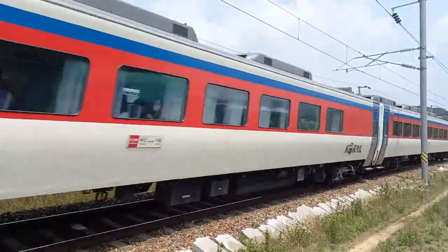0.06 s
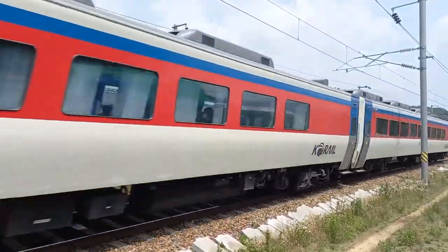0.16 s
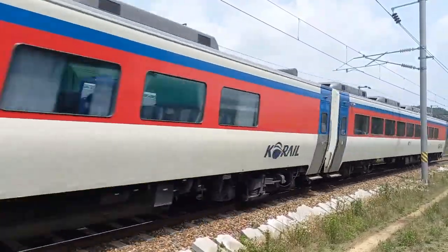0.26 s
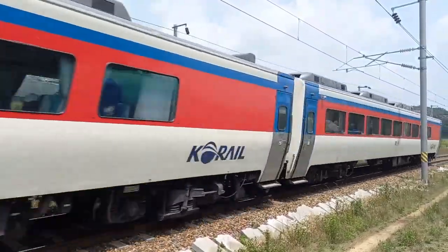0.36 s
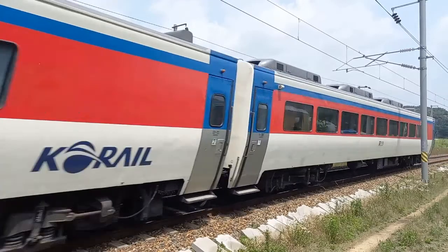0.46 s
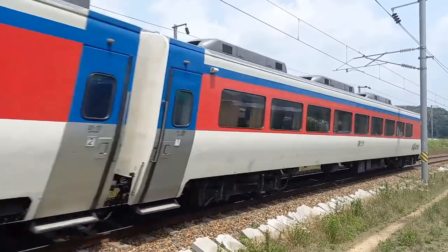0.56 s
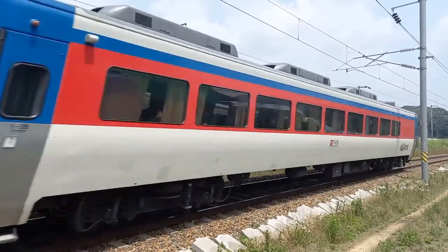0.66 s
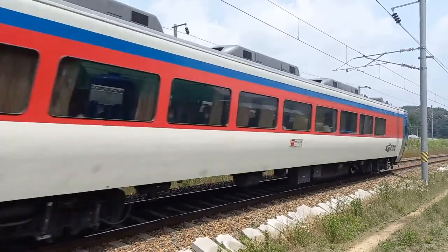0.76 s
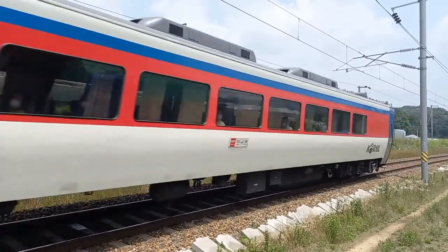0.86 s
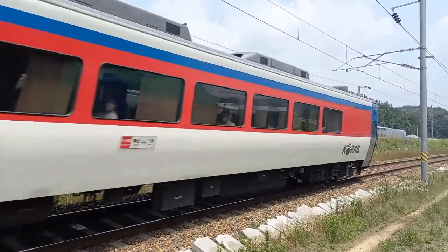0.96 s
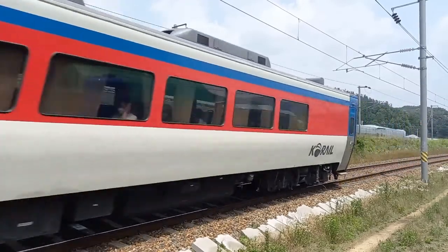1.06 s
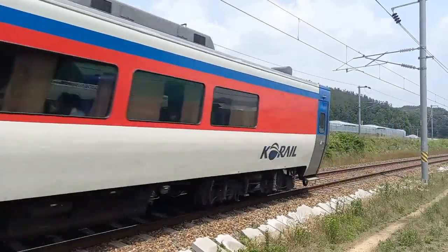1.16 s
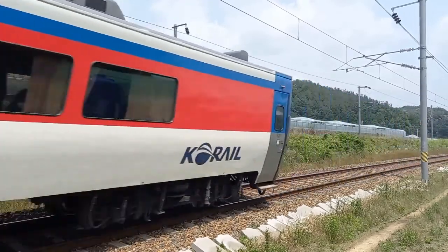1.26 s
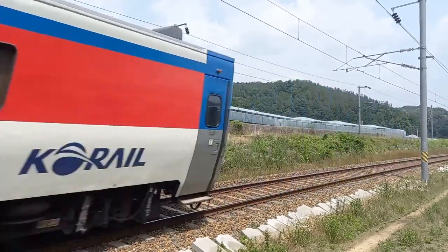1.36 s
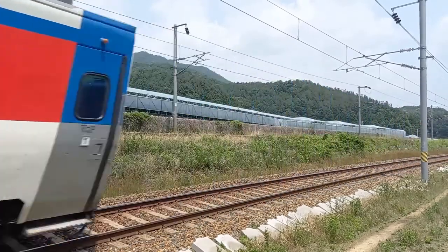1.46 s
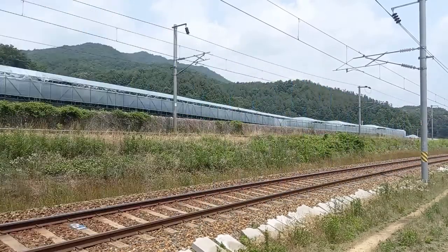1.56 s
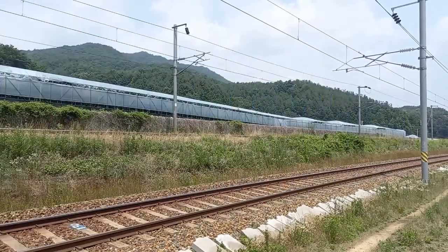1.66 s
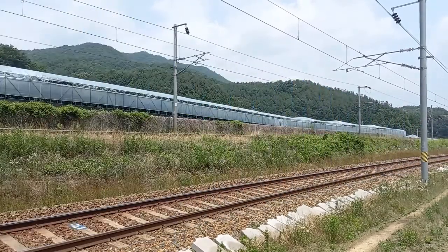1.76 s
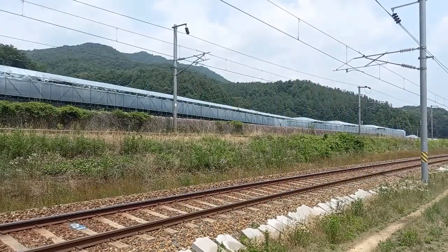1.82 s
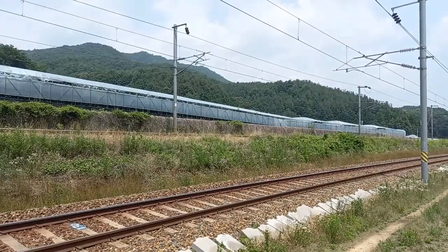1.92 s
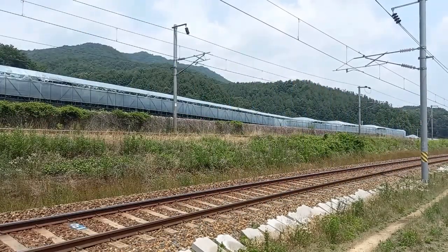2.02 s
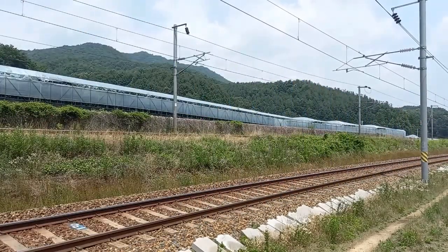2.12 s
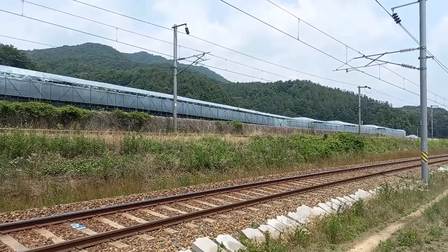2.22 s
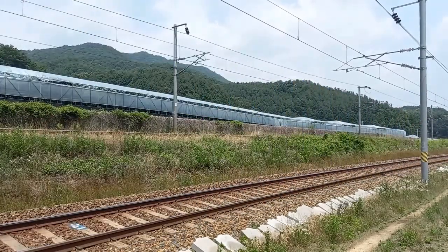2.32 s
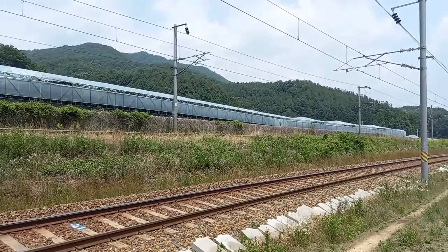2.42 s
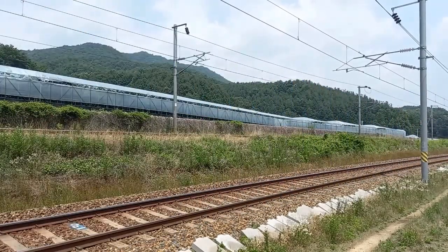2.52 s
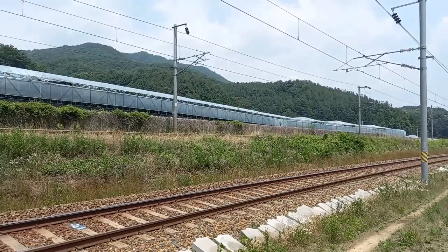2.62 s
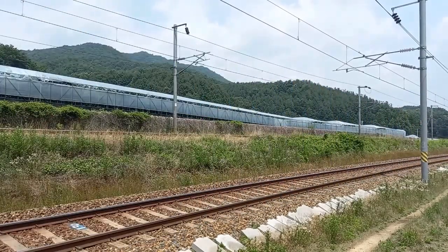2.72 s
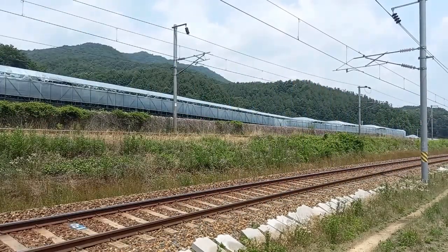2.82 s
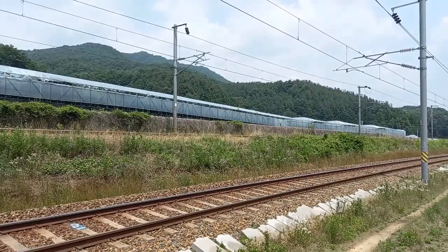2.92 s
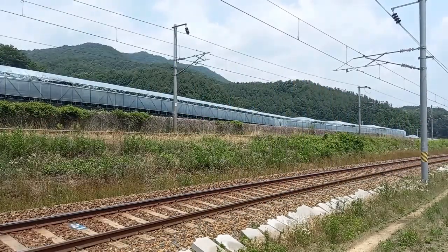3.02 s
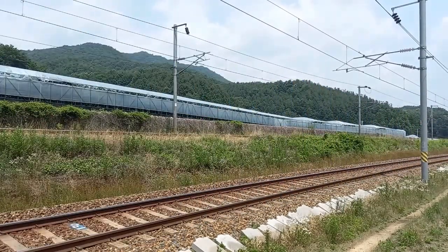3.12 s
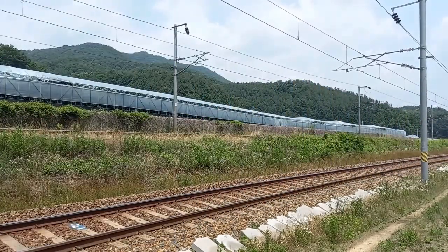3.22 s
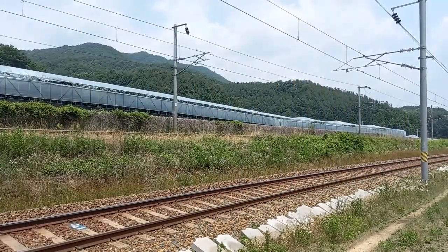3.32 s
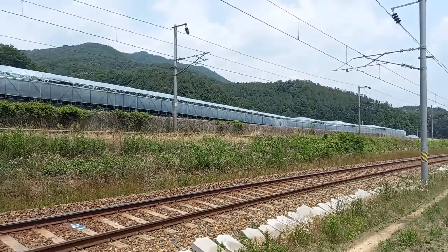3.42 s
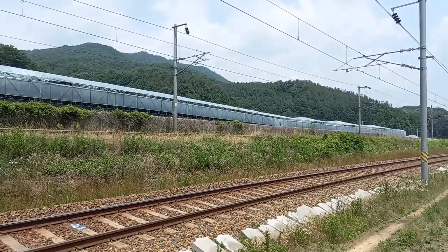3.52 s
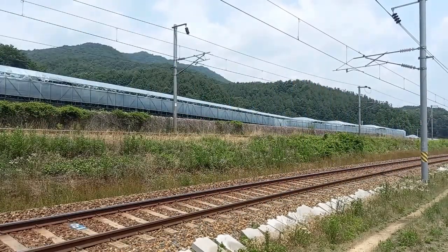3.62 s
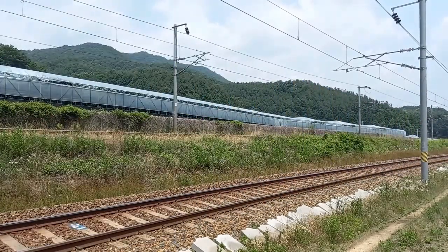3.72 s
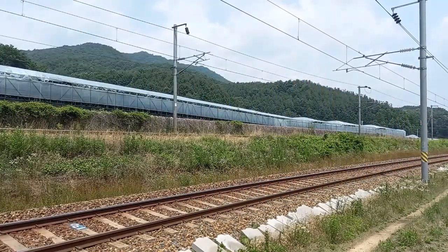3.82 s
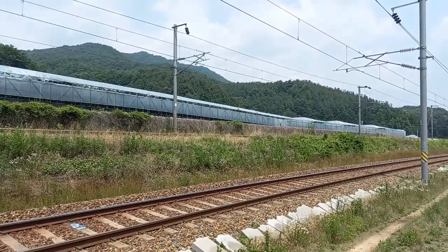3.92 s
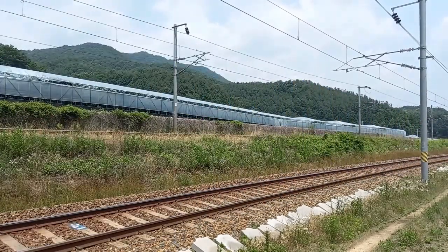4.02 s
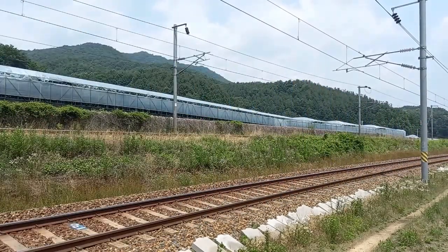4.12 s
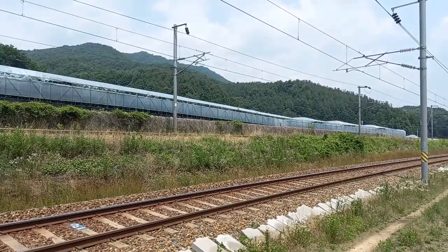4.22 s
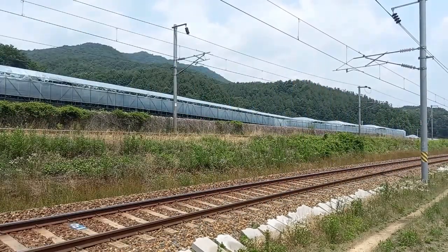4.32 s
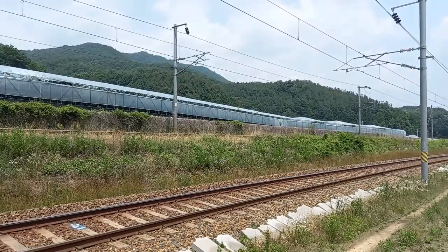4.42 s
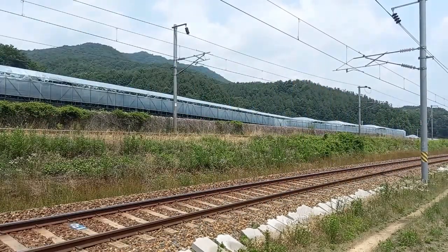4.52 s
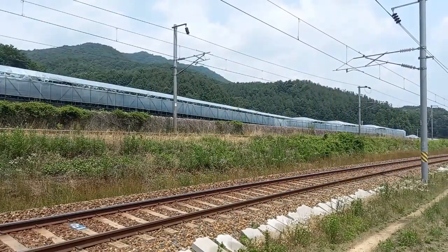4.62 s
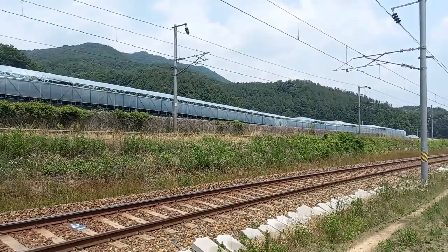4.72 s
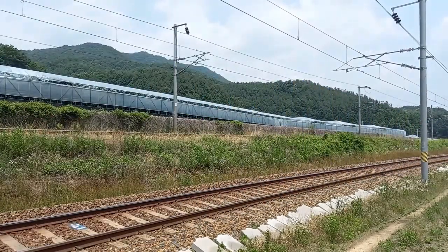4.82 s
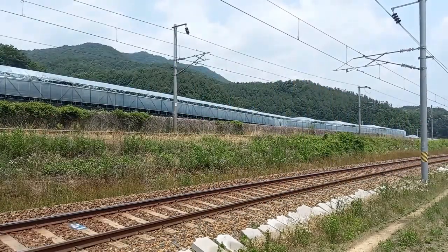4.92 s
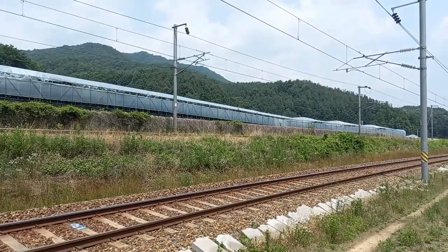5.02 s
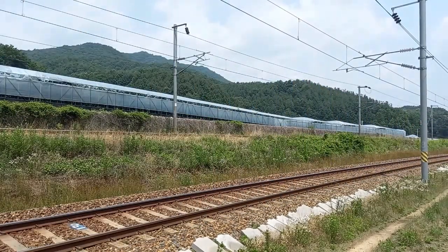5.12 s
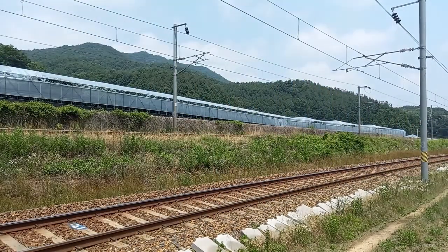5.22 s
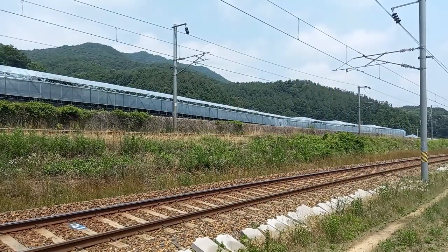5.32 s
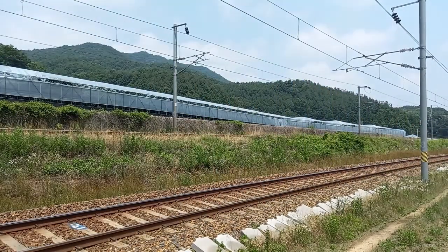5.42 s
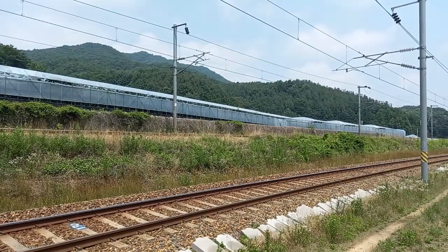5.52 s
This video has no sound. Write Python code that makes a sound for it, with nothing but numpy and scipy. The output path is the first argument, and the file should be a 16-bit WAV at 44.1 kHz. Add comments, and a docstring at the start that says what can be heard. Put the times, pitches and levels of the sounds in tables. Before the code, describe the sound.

Close trackside pass of a train's tail: booming roar, hiss and whine, sharp sizzling rail-joint knocks, a singing rail fading, abrupt near silence.

```python
"""The last coaches of a passenger train roll past a phone beside the track and draw away to the left.
Shaped noise and short low swings make the rumble; noise bands make the rolling roar, hiss and ringing.
Gliding sine tones make the whine of underfloor machines. Axles knock over a rail joint: sizzles come through
the steel, low knocks through the air; several later knocks follow a sizzle by about 60 ms. The rail sings
on, wind buffets the phone's two microphone openings (ports), and a cut at the end leaves a faint hush."""
import sys
import numpy as np
from scipy import signal
from scipy.fft import rfft, irfft
from scipy.io import wavfile
from scipy.ndimage import uniform_filter1d, map_coordinates

SR = 44100
rng = np.random.default_rng(int(sys.argv[2]) if len(sys.argv) > 2 else 0)


def transcribe(signal):
    """Save signal, clipped to [-1, 1], as a 16-bit WAV file at the path in sys.argv[1]."""
    frames = np.atleast_2d(signal).T
    limited = np.clip(frames, -1, 1)
    pcm = np.round(limited * 32767).astype(np.int16)
    wavfile.write(sys.argv[1], SR, pcm)


N = 245637
T = np.arange(N) / SR  # time of every sample in seconds
FRAME, HOP = 512, 128  # length and step in samples of the short slices whose spectrum is changed


def undb(db):
    """Turn decibels into a plain factor."""
    return 10 ** (np.asarray(db) / 20)


def curve(table, x):
    """Read all columns after the first at the points x (times or pitches), with straight lines between rows."""
    columns = np.transpose(table)
    return [np.interp(x, columns[0], column) for column in columns[1:]]


def tone(table, hz):
    """Read a spectrum in dB at the frequencies hz; outside its ends it is practically silent."""
    table_hz, db = np.transpose(table)
    return np.interp(np.log(hz + 1), np.log(table_hz), db, left=-90, right=-90)


def shaped(table):
    """Random noise coloured by a spectrum, then scaled to an average strength (rms) of 1."""
    white = rfft(rng.standard_normal(N))
    coloured = irfft(white * undb(tone(table, np.fft.rfftfreq(N, 1 / SR))), N)
    return coloured / coloured.std()


def walk(rate):
    """A wandering random level: new values come at this rate per second, smoothed twice; spread 1."""
    hold = int(SR / rate)
    steps = np.repeat(rng.standard_normal(N // hold + 1), hold)
    smooth = uniform_filter1d(uniform_filter1d(steps, hold), hold)[:N]
    return smooth / smooth.std()


def to_slices(x):
    """Split a sound into pitches in Hz, slice times in seconds and the spectrum of each slice."""
    return signal.stft(x, SR, nperseg=FRAME, noverlap=FRAME - HOP)


def from_slices(spectra):
    """Join the slices into a sound again."""
    return signal.istft(spectra, SR, nperseg=FRAME, noverlap=FRAME - HOP)[1][..., :N]


def patchy(x, depth_db, rate, width_hz):
    """Let every patch of time and pitch swell and sink on its own, then scale to rms 1."""
    hz, s, spectra = to_slices(x)
    grid = rng.standard_normal((400, 400))
    at = np.meshgrid(np.minimum(hz / width_hz, 398), np.minimum(s * rate, 398), indexing="ij")
    y = from_slices(spectra * undb(depth_db * map_coordinates(grid, at, order=1)))
    return y / y.std()


def bump(s, half_s):
    """A smooth swell around the time s; half_s away from it, it has sunk to 37 percent."""
    return np.exp(-((T - s) / half_s) ** 2)


def blows(s, db, pole):
    """Each blow starts a decay; a complex pole (the factor from one sample to the next) makes it ring."""
    kicks = np.zeros(N, complex)
    kicks[(s * SR).astype(int)] = undb(db)
    return signal.lfilter([1], [1, -pole], kicks)


def burst(s, db, attack_s, t60):
    """Loudness of a row of blows: a quick rise, then a fall by 60 dB in t60 seconds."""
    fall = blows(s, db, 1000 ** (-1 / (t60 * SR)))
    missing_at_start = blows(s, db, np.exp(-1 / (attack_s * SR)))
    return (fall - missing_at_start).real.clip(0)


def receding(near, far, from_s, to_s):
    """Noise whose colour turns from near to far as the train draws away."""
    share = np.clip((T - from_s) / (to_s - from_s), 0, 1)
    return np.sqrt(1 - share) * shaped(near) + np.sqrt(share) * shaped(far)


# Colour of the hush. Each row: pitch in Hz, relative level in dB per Hz.
HUSH_TONE = [(18, -40), (30, -12.5), (81, -1), (225, -18), (750, -22.5), (970, -18), (1300, -25.5),
             (1770, -28), (3490, -32.5), (5170, -33), (6370, -19), (7300, -37), (9430, -49), (12000, -35.5),
             (15500, -37.5)]
HUSH_DB, HUSH_START_S = -69, 5.197


def hush():
    """A faint outdoor hush: noise that swells and sinks in patches, partly shared by the two ports."""
    shared = patchy(shaped(HUSH_TONE), depth_db=3.0, rate=17, width_hz=247)
    pair = [patchy(shared + 1.3 * shaped(HUSH_TONE), depth_db=1.5, rate=15, width_hz=400) for _ in range(2)]
    fade_in = np.clip((T - HUSH_START_S) / 0.006, 0, 1)
    return np.array(pair) * undb(HUSH_DB) * fade_in


# Colour of the wind. Each row: pitch in Hz, relative level in dB per Hz.
WIND_TONE = [(30, -20), (50, -8), (80, 0), (110, -5), (200, -20), (500, -30)]
# Draught of the train, then still air. Each row: time in seconds, wind level in dB.
DRAUGHT = [(0, -44), (1.8, -35.5), (2.0, -54), (3.1, -54), (5.17, -56.5)]
# Gusts. Each row: middle in seconds, half length in seconds, level in dB, left minus right in dB.
GUSTS = [(1.3, .06, -38, -3), (3.33, .06, -41, 2), (3.48, .04, -39, 10), (4.98, .05, -38, 14),
         (5.13, .08, -35, 18)]


def wind():
    """Moving air buffets each port: low noise with gusts, its noise unrelated left and right."""
    steady = undb(curve(DRAUGHT, T)[0])
    sides = []
    for side in (1, -1):  # left, right
        gusts = sum(undb(db + side * lean_db / 2) * bump(s, half_s) for s, half_s, db, lean_db in GUSTS)
        sides.append(shaped(WIND_TONE) * (steady + gusts) * undb(2 * walk(15)))
    return np.array(sides)


# Colour of the singing rail. Each row: pitch in Hz, relative level in dB per Hz.
RAIL_TONE = [(930, -6), (1060, -8), (1130, 0), (1220, -9), (1350, -3), (1500, 1), (1650, -1), (1685, -16),
             (1750, -33.5)]
# Loudness of the singing rail. Each row: time in seconds, level in dB.
RAIL_LEVEL = [(0, -37.5), (1.29, -36), (1.8, -40.5), (2.27, -41), (2.52, -39.5), (2.9, -44), (3.15, -38.5),
              (3.32, -46.5), (3.45, -37), (3.75, -37.5), (3.85, -46.5), (4.02, -41.5), (4.15, -45.5),
              (4.4, -45), (4.74, -41.5), (5.02, -48)]


def rail_song():
    """Waves in the rail travel far in two narrow bands, made from patchy noise."""
    song = patchy(shaped(RAIL_TONE), depth_db=1.2, rate=20, width_hz=150)
    return song * undb(curve(RAIL_LEVEL, T)[0])


# Axles over the joint, carried by the steel.
# Each row: start in seconds, level in dB, part under about 7 kHz in dB relative to that level.
ZINGS = [(0.285, -27, -18.5), (0.888, -27, -6), (1.1899, -30, 0), (1.789, -24, -1), (1.8744, -35, 8),
         (2.076, -24, -0.5), (2.165, -21, -6), (2.686, -18, 1), (2.776, -17.5, -1.5)]
ZING_RISE_S, ZING_T60_S = 0.0024, 0.03
ZING_LEAN_DB, ZING_OWN = 2.5, 2.2  # left minus right; weight of each port's own sizzle against the shared one
REBOUND_S, REBOUND_DB = .006, -1.5  # delay after the blow and relative level


def sizzle():
    """Blows sizzle along the steel: noise with a fast fall, a weak long tail and a rebound."""
    s, db, low_db = np.transpose(ZINGS)

    def envelope(level_db, tail):
        return burst(s, level_db, ZING_RISE_S, ZING_T60_S) + tail * burst(s, level_db, 0.0074, 0.64)

    def zing():
        high_tone = [(7600, -12), (10000, 0), (12000, -1.0), (13500, -4.0), (15000, -4.5), (15700, -1.5)]
        high = shaped(high_tone) * envelope(db, tail=0.06)
        low_tone = [(4500, -15), (5900, -1), (6600, 6.0), (7200, -2.5)]
        low = shaped(low_tone) * envelope(db + low_db, tail=0.062)
        # the wheel strikes the far rail end, heard in the top treble
        rebound_tone = [(9500, -10.5), (12000, 3), (15700, -3.5)]
        rebound = shaped(rebound_tone) * burst(s + REBOUND_S, db + REBOUND_DB, 0.00096, 0.015)
        return high + low + rebound

    shared = zing()
    pair = [(shared + ZING_OWN * zing()) * undb(side * ZING_LEAN_DB / 2) for side in (1, -1)]
    return np.array(pair) / np.hypot(1, ZING_OWN)


# Low knocks through the air; several of the later ones follow a sizzle by about 60 ms.
# Each row: start in seconds, level in dB, then clack and thud in dB relative to that level.
KNOCKS = [(0.047, -15.5, -13, -9.5), (0.47, -30, -21.5, -6), (0.587, -17, -11.5, -4), (1.717, -28, -4, -9),
          (1.805, -20, -15, 0), (2.14, -20.5, -8.5, -1.5), (2.224, -13.5, -17.5, -8.5),
          (2.748, -12.5, -13.5, -6), (2.831, -10, -16.5, -10)]
# Low tones of the ring. Each row: pitch in Hz, relative level in dB, time to fall by 60 dB in seconds.
KNOCK_MODES = [(118, -13.5, 0.31), (202, -1, 0.018), (302, -2, 0.041), (451, -15, 0.02), (713, -10, 0.03)]
# Colour of the thud. Each row: pitch in Hz, relative level in dB per Hz.
THUD_TONE = [(130, 3.5), (200, 12.5), (350, 5.5), (700, -9), (1200, -26.5)]


def knocks():
    """Knocks at the joint arrive through the air as a low ring with a clack and a thud."""
    s, db, clack_db, thud_db = np.transpose(KNOCKS)
    clack = shaped([(700, 7), (3000, -3.5), (7000, -7.0)]) * burst(s, db + clack_db, 0.0034, 0.3)
    # ballast and sleepers answer under the ring
    thud = shaped(THUD_TONE) * burst(s, db + thud_db, 0.0078, 0.21)
    ring = 0
    for k, (hz, mode_db, t60) in enumerate(KNOCK_MODES):
        pole = np.exp((2j * np.pi * hz - np.log(1000) / t60) / SR)
        uneven_db = rng.standard_normal(len(s))
        ring = ring + (-1) ** k * blows(s, db + mode_db + uneven_db, pole).imag
    return clack + thud - ring


# Clanks of the rail. Each row: start in seconds, level in dB.
RAIL_CLANK = [(2.211, -26.5), (2.697, -23.5), (2.785, -17.5)]
# Colour of the clank. Each row: pitch in Hz, relative level in dB per Hz.
CLANK_TONE = [(500, -10), (730, -2), (1000, -8), (1300, -3), (1600, 0), (1690, -2), (1780, -20),
              (2600, -22)]
# Timing of every clank: rise time in seconds, time to fall by 60 dB in seconds.
CLANK_TIMES = .0015, .14


def rail_clank():
    """The struck rail clanks: a burst of mid-pitched noise that starts fast and dies away."""
    s, db = np.transpose(RAIL_CLANK)
    rise_s, ring_s = CLANK_TIMES
    return shaped(CLANK_TONE) * burst(s, db, attack_s=rise_s, t60=ring_s)


# One whining machine per coach. Each row: time of passing in seconds, pitch of the source in Hz.
WHINES = [(-.05, 1220), (1.235, 1168)]
# One table per coach. Each row: time in seconds, level of the whine in dB, level of its octave in dB.
WHINE_LEVELS = [
    [(0, -44, -64), (.2, -40, -60), (.27, -31, -48), (.4, -36, -68), (.6, -46, -41), (.7, -50, -66),
     (1.0, -60, -72)],
    [(.65, -49, -66), (.78, -43, -48), (.86, -37, -47.5), (.91, -32.5, -36.5), (.96, -26.5, -40),
     (1.0, -37.5, -38.5), (1.08, -33, -35.5), (1.12, -35, -36.5), (1.17, -22, -52), (1.22, -27, -39),
     (1.28, -26, -43), (1.36, -35, -40), (1.41, -40, -46), (1.44, -26, -55), (1.53, -31, -63),
     (1.6, -35, -46), (1.8, -37, -51), (2.0, -60, -73)],
]
SPEED_M_S, TRACK_M = 23, 5.2  # train speed, distance to the track
# the left port's lead: middle value, swing to either side, how early before the pass and how fast it swings
LEAD_MS, SWING_MS, SWING_EARLY_S, SWING_S = 0.22, 0.22, 0.15, 0.1
WHINE_JITTER_HZ = 8
WHINE_WAVER_DB, WHINE_FLUTTER_DB, WHINE_PORT_DB = 1.5, 3, 1.5  # slow, fast, and separate at each port


def whine(row, levels):
    """An underfloor machine whines with its octave, breaking up; pitch falls and direction swings in passing."""
    pass_s, source_hz = row
    db, octave_db = curve(levels, T)
    along_m = SPEED_M_S * (T - pass_s)
    moving_away = along_m / np.hypot(along_m, TRACK_M)  # -1 coming, +1 going
    hz = source_hz / (1 + SPEED_M_S / 343 * moving_away)  # sound travels at 343 m/s
    lead_ms = LEAD_MS + SWING_MS * np.tanh((T - pass_s + SWING_EARLY_S) / SWING_S)
    turns = np.cumsum(hz + WHINE_JITTER_HZ * walk(110)) / SR
    right_lag = np.array([0 * T, hz * lead_ms / 1000])  # in turns; none at the left port
    phase = 2 * np.pi * (turns - right_lag)

    def waver():
        common_db = WHINE_WAVER_DB * walk(25) + WHINE_FLUTTER_DB * walk(120)
        return undb(common_db + WHINE_PORT_DB * np.array([walk(60), walk(60)]))

    base = waver() * undb(db) * np.sin(phase)
    octave = waver() * undb(octave_db) * np.sin(2 * phase)
    return np.sqrt(2) * (base + octave)


# Ringing tones of the passing train: a low hum at 476 Hz and three higher wheel tones.
# Each row: pitch in Hz, width in Hz.
RINGING_TONES = [(476, 14), (2300, 120), (4330, 130), (6050, 150)]
# Steady ring while the train is alongside: one level in dB for each ringing tone.
RING_DB = [-42, -68, -66, -72.5]
RING_END_S, RING_FALL_DB_S = 1.1, 6  # then the steady ring sinks, in dB per second
# Swells of the ringing tones, each with its own middle, length and levels.
# Each row: middle in seconds, half length in seconds, then a level in dB for each ringing tone.
RING_SWELLS = [(.2, 0.38, -34.5, -58, -69.5, -83), (.84, 0.083, -61, -51, -48, -37.5),
               (1.01, 0.11, -39, -36, -41.5, -65.5), (1.47, 0.058, -69, -70, -61, -45),
               (1.63, 0.17, -66, -68, -41, -43), (2.5, 0.62, -45.5, -51, -63, -64)]


def ringing():
    """A low hum and three higher wheel tones swell and sink, made from narrow noise bands."""
    sinking_db = -RING_FALL_DB_S * np.maximum(T - RING_END_S, 0)
    swells = sum(np.outer(undb(dbs), bump(s, half_s)) for s, half_s, *dbs in RING_SWELLS)
    total = 0
    for (hz, width), db, swell in zip(RINGING_TONES, RING_DB, swells):
        band = [(hz - 2 * width, -18), (hz - width / 2, 0), (hz + width / 2, 0), (hz + 2 * width, -18)]
        level = undb(db + sinking_db) + swell
        total = total + shaped(band) * level * undb(.8 * walk(20))
    return total


# Loudness of the rolling. Each row: time in seconds, roar in dB, hiss in dB, thin treble in dB.
ROLL_LEVELS = [(0, -22.5, -32, -44.5), (.56, -22, -31.5, -45.5), (1.06, -26, -30.5, -42),
               (1.55, -28, -30.5, -45), (1.96, -32, -37.5, -47.5), (2.5, -35, -42, -52),
               (2.77, -35.5, -41, -52.5), (2.95, -32.5, -42, -53.5), (3.31, -37, -44.5, -53),
               (3.75, -34.5, -46, -53.5), (4.0, -40, -47, -54), (5.02, -47, -52.5, -58.5)]
# Colours of roar, hiss and treble, near and far. Each row: pitch in Hz, relative level in dB per Hz.
ROAR_NEAR, ROAR_FAR = [(120, -35), (200, 0.5), (398, -2.5), (470, -0.5), (620, -2), (893, -10),
                       (1170, -4.5), (1300, -7), (1690, -41), (2860, -120)], [(120, -13), (200, -4.5), (349, -4), (455, -2.5), (545, -5.5),
                                          (996, -3), (1300, -5.5), (1690, -38.5), (2860, -120)]
HISS_NEAR, HISS_FAR = [(1060, -46), (1800, -4.5), (2410, -5), (3200, -6), (4420, -10), (5120, -9.5),
                       (6230, -8.5), (6980, -8.5), (7450, -31.5), (9680, -30), (16400, -120)], [(1060, -33.5), (1800, -6), (2080, 4), (2500, -2.5), (2720, 5.5),
                                          (2850, -1.5), (3170, -5.5), (3400, -1), (3560, -5), (4100, -5),
                                          (4350, -6.5), (6580, -8), (6980, -10), (7450, -55), (9680, -50),
                                          (16400, -120)]
TREBLE_NEAR, TREBLE_FAR = [(4410, -28.5), (7500, -4.5), (9180, -1.5), (12500, -2), (15100, -8.5),
                           (15600, -8.5)], [(4410, -53.5), (7500, -17.5), (8640, -21.5), (9380, -10.5),
                                             (12200, 3), (15600, 1.5)]


def rolling():
    """Rough wheel on rough rail: a roar, a hiss and thin treble, all made from patchy noise."""
    roar_db, hiss_db, treble_db = curve(ROLL_LEVELS, T)
    roar = patchy(receding(ROAR_NEAR, ROAR_FAR, 1.33, 3.1), depth_db=1.3, rate=14, width_hz=141.0)
    hiss = patchy(receding(HISS_NEAR, HISS_FAR, 0.64, 3.3), depth_db=2.04, rate=9.1, width_hz=319)
    treble = patchy(receding(TREBLE_NEAR, TREBLE_FAR, 1.3, 3.87), depth_db=2.5, rate=14, width_hz=1500)
    return undb(roar_db) * roar + undb(hiss_db) * hiss + undb(treble_db) * treble


# Loudness of the rumble. Each row: time in seconds, level in dB.
RUMBLE_LEVEL = [(0, -21.5), (.4, -23), (.8, -19.5), (1.0, -24.5), (1.4, -26), (1.8, -22.5), (2.0, -31.5),
                (2.6, -34), (2.8, -33), (3.0, -38.5), (3.8, -35.5), (4.0, -37.5), (5.17, -38.5)]
# Colours of the rumble, near and far. Each row: pitch in Hz, relative level in dB per Hz.
RUMBLE_NEAR, RUMBLE_FAR = [(15, -53.5), (25, -21.5), (88, 4), (108, -2), (161, -1.5), (200, -23),
                           (260, -29), (440, -120)], [(15, -54.5), (25, -24), (43, -6), (57, -13.5), (75, 3),
                                                (113, -10.5), (200, -15), (260, -43.5), (440, -120)]
LUMP_DB, LUMP_RATE = 0.94, 15  # depth and rate per second of the random lumps
# Loudest lumps. Each row: middle in seconds, level in dB, pitch in Hz, half length in seconds.
BOOMS = [(0.026, -9, 91, 0.0086), (0.053, -5, 97, 0.015), (0.159, -6.5, 106, 0.01), (0.255, -14, 95, 0.023),
         (.385, -16, 108, 0.014), (0.482, -8.5, 112, 0.0086), (0.599, -18, 103, 0.016),
         (.71, -12.5, 133, 0.011), (0.851, -19, 84, 0.03), (1.165, -25, 115.5, 0.044),
         (1.243, -19.5, 103, 0.022), (1.552, -21, 113, 0.029), (1.668, -21, 102, 0.023),
         (1.733, -16, 94, 0.013), (1.825, -14, 84.5, 0.012), (1.963, -23.5, 86, 0.035),
         (2.761, -23.5, 90, 0.026), (3.043, -28, 91, 0.027), (3.152, -28, 90, 0.0085),
         (3.283, -26, 85, 0.025), (4.329, -34, 84, 0.01), (4.478, -32.5, 85, 0.023)]
# Colour of the ballast thud under each boom. Each row: pitch in Hz, relative level in dB per Hz.
BOOM_BODY = [(130, -8.5), (250, -4), (360, 0), (500, 2), (700, -11.5), (1200, -29.5)]
BOOM_BODY_DB = -17.5  # relative to the boom


def rumble():
    """Coach bodies and ballast boom in uneven lumps of noise; the loudest are short low swings."""
    level = undb(curve(RUMBLE_LEVEL, T)[0] + LUMP_DB * walk(LUMP_RATE))
    body = undb(BOOM_BODY_DB) * shaped(BOOM_BODY)
    booms = 0
    for s, db, hz, half_s in BOOMS:
        swing = np.sin(2 * np.pi * (hz * (T - s) + rng.random()))  # starts at a random point of its cycle
        booms = booms + undb(db) * bump(s, half_s) * (swing + body)
    return receding(RUMBLE_NEAR, RUMBLE_FAR, 1.3, 3.7) * level + booms


# Sound that both ports hear alike. Each row: pitch in Hz, share from 0 to 1.
ALIKE = [(30, .98), (200, .97), (500, .84), (900, .7), (1600, .68), (2200, .35), (5000, .15), (15000, .3)]
# Loudness between the ports, near and far. Each row: pitch in Hz, left minus right in dB.
LEAN_NEAR, LEAN_FAR = [(100, 0), (2000, .8), (15000, 3.5)], [(100, 0), (900, 0), (1100, 1.5), (1550, -2.5), (2200, .8),
                                          (15000, 3.5)]
# How far the left port is ahead, near and far. Each row: pitch in Hz, phase lead in radians.
LEAD_NEAR, LEAD_FAR = [(0, 0), (1210, 3.0), (1890, 5.7), (3010, 7.7), (6550, 19.0), (16000, 44)], [(0, 0), (520, 1.2), (1640, 4.9), (2070, 4.6), (3360, 7.0),
                                          (6630, 13.9), (16000, 34)]


def ports(x):
    """The left port hears the train first; scattered sound makes the right port partly its own."""
    hz, s, left = to_slices(x)
    far = np.clip((s - 1.7) / .8, 0, 1)

    def blend(near_table, far_table):
        return np.outer(curve(near_table, hz)[0], 1 - far) + np.outer(curve(far_table, hz)[0], far)

    lead = blend(LEAD_NEAR, LEAD_FAR)
    lean_db = blend(LEAN_NEAR, LEAN_FAR)
    alike = curve(ALIKE, hz)[0][:, None]
    # fresh noise that follows the smoothed strength of the train
    noise = to_slices(rng.standard_normal(N))[2]
    power = uniform_filter1d(uniform_filter1d(np.abs(left) ** 2, size=3, axis=0), size=7, axis=1)
    scattered = np.sqrt(power.clip(0) / np.mean(np.abs(noise) ** 2)) * noise
    right = alike * left * np.exp(-1j * lead) + np.sqrt(1 - alike ** 2) * scattered
    return from_slices(np.array([left * undb(lean_db / 2), right * undb(-lean_db / 2)]))


CUT_S, CUT_FADE_S = 5.167, .003  # start of the cut, time to sink to 37 percent


def scene():
    """The train, its sizzles through the steel, its whines and the wind are cut off; the hush follows."""
    passing = ports(rumble() + rolling() + ringing() + rail_song() + knocks() + rail_clank())
    whines = sum(map(whine, WHINES, WHINE_LEVELS))
    outdoors = passing + sizzle() + whines + wind()
    cut = np.exp(-np.maximum(T - CUT_S, 0) / CUT_FADE_S)
    return outdoors * cut + hush()


MIC_LOW_HZ, TOP_HZ = 53.4, 15770


def record(dry):
    """The microphone loses the deepest bass; the phone cuts the top."""
    thin = signal.sosfilt(signal.butter(2, MIC_LOW_HZ, "high", fs=SR, output="sos"), dry)
    return signal.sosfilt(signal.ellip(10, .2, 70, TOP_HZ, fs=SR, output="sos"), thin)


dry = scene()
out = record(dry)
transcribe(out)
```